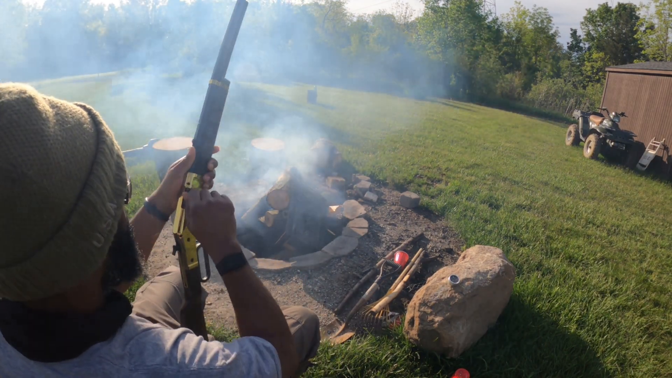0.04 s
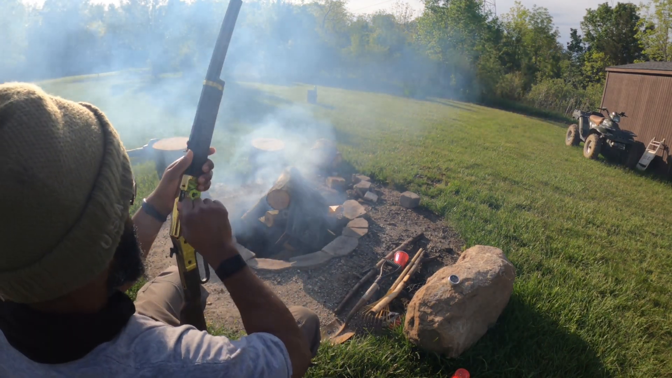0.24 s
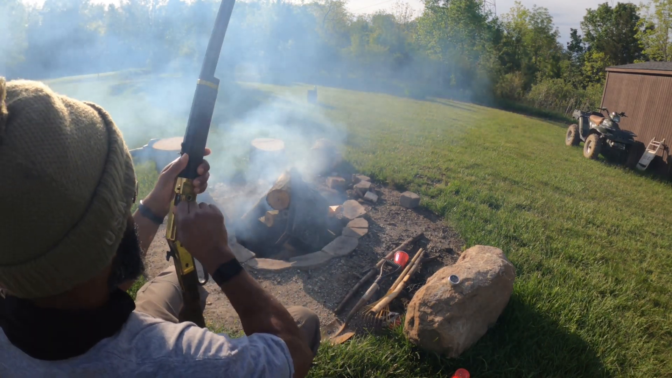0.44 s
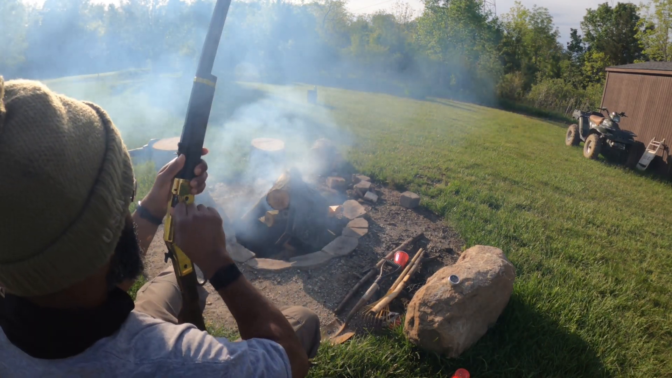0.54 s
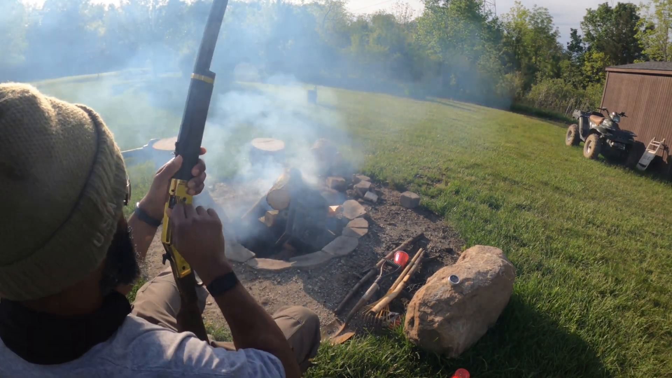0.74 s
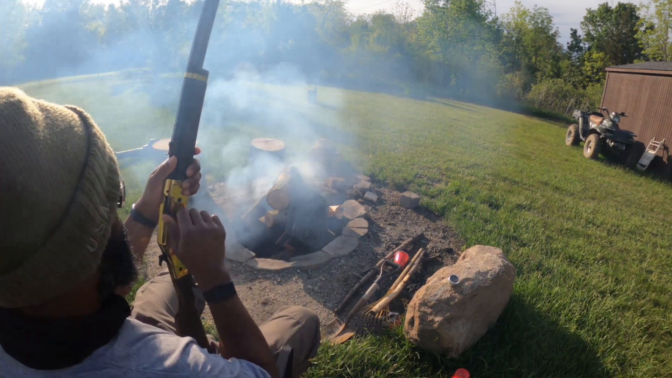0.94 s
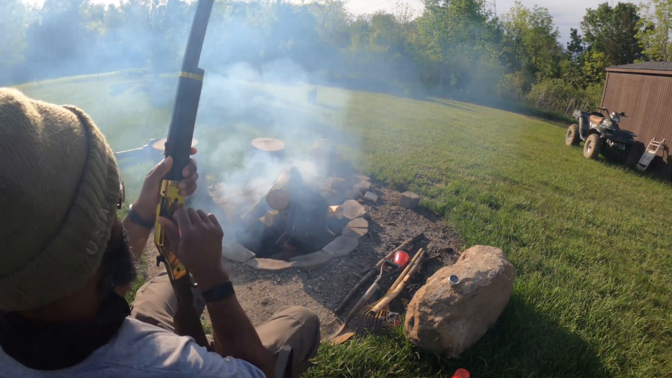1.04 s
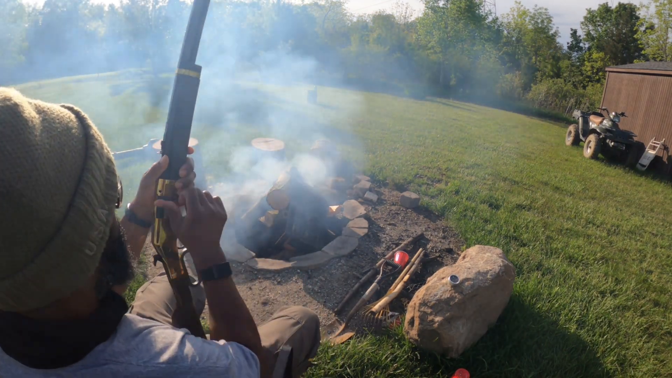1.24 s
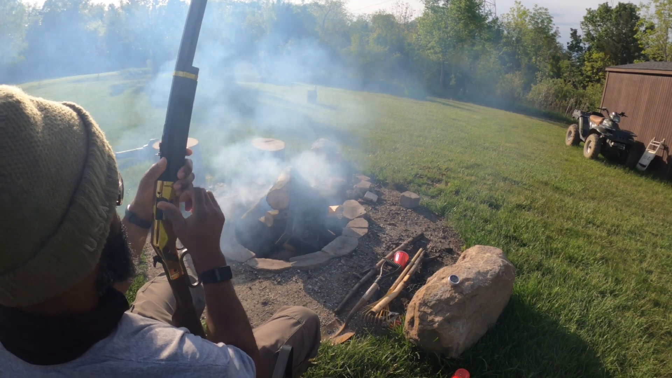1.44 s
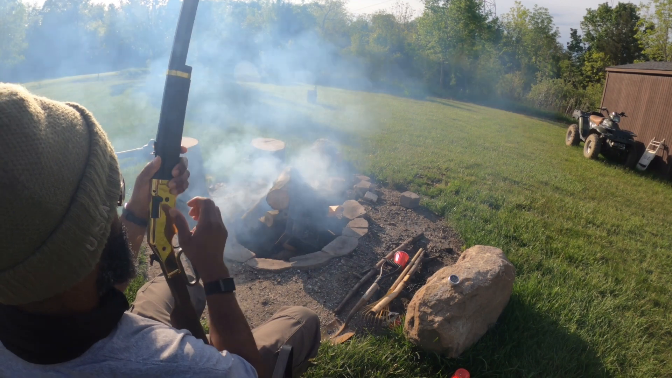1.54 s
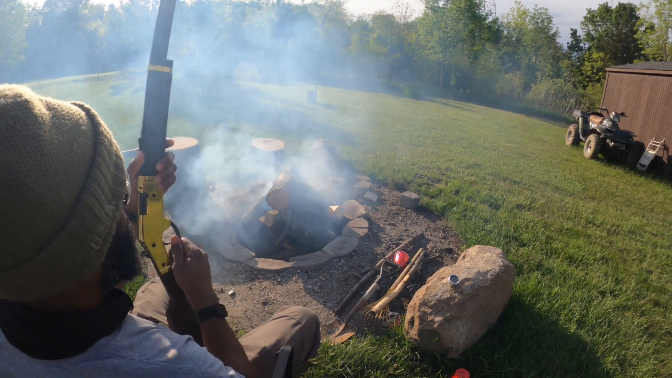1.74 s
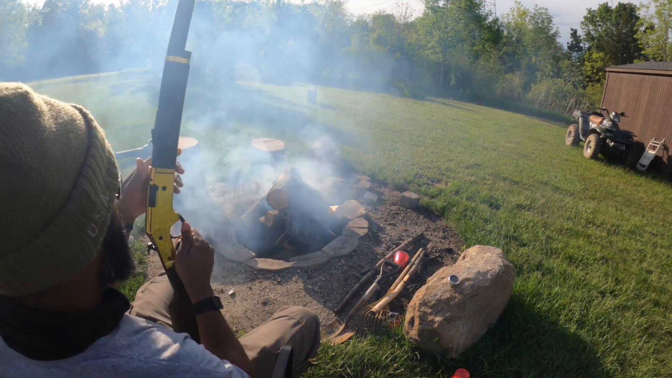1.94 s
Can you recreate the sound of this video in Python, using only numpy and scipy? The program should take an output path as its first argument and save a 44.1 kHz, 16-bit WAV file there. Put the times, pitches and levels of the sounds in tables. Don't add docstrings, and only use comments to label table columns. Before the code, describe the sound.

Steel lever parts scrape, click and slam, first opening, then shutting about a second later, with small spring pings and a short dry echo; outdoors, close microphone, soft wind, distant birdsong and slight sleeve rustle.

```python
import sys
import numpy as np
from scipy import signal
from scipy.fft import rfft, irfft, next_fast_len
from scipy.io import wavfile
from scipy.ndimage import uniform_filter1d, map_coordinates

SR = 44100
rng = np.random.default_rng(int(sys.argv[2]) if len(sys.argv) > 2 else 0)


def wrap_up_sound(samples):
    columns = np.atleast_2d(samples).T
    tamed = np.clip(columns, -1, 1)
    steps = np.round(tamed * 32767).astype(np.int16)
    wavfile.write(sys.argv[1], SR, steps)


def attenuation_scalar(level_db):
    decades = np.asarray(level_db, float) / 20
    return 10 ** decades


N = 88200


def unit(x):
    return x / np.sqrt(np.mean(x ** 2) + 1e-20)


def along(points, hz):
    f, v = np.transpose(points)
    return np.interp(np.log(hz + 1), np.log(f + 1), v)


def wobble(rate):
    knots = rng.standard_normal(int(N * rate / SR) + 4)
    return map_coordinates(knots, [np.arange(N) * rate / SR])


def filtered(x, response):
    m = next_fast_len(x.shape[-1] + 4096)
    return irfft(rfft(x, m) * response(np.fft.rfftfreq(m, 1 / SR)), m)[..., :x.shape[-1]]


def rush(spectrum, alike, patchy_db):
    z = signal.stft(rng.standard_normal((2, N)), nperseg=512)[2]
    field = uniform_filter1d(rng.standard_normal(z.shape[1:]), size=5, axis=0)
    field = uniform_filter1d(field, size=10, axis=1)
    pair = signal.istft(z * attenuation_scalar(patchy_db * unit(field)), nperseg=512)[1][:, :N]

    def mid_side(hz):
        angle = np.arccos(np.clip(along(alike, hz), -1, 1)) / 2
        return attenuation_scalar(along(spectrum, hz)) * [np.cos(angle), np.sin(angle)]

    mid, side = filtered(pair, mid_side)
    return unit(np.array([mid + side, mid - side]))


def tail(x, t60):
    t = np.arange(SR // 4) / SR
    answer = rng.standard_normal((2, len(t))) * attenuation_scalar(-60 * t / t60) * (1 - np.exp(-t / 0.0048))
    return signal.fftconvolve(x[None], answer / np.linalg.norm(answer[0]), axes=1)[:, :N]


# (start [s], length [s])
STROKES = [(-.003, .075), (.206, .071), (.28, .11), (.675, .05), (.802, .06), (1.145, .022), (1.167, .02),
           (1.238, .09), (.178, .03), (.06, .08), (1.186, .05)]
# (level [dB], fade over the stroke [dB], brightness [dB per octave])
PRESSURE = [(-48, -21.5, 2), (-48, 4.5, -1.5), (-49.5, -12.5, 1.5), (-54, -8, -3), (-60, -5.5, -9.5),
            (-59.5, 0, -2), (-53, 5, 6.5), (-35.5, -37, -0.5), (-55, -2, -4), (-79.5, 13.5, -0.5),
            (-48.5, 1, 2.5)]
# (frequency [Hz], level [dB])
DRAG_COLOUR = [(600, -3), (1000, 2), (1400, 9.5), (2500, 3), (4000, 0), (7000, -10.5), (12000, -30),
               (16000, -59)]
SLIPS_PER_S, SLIP_SPREAD_DB, SLIP_T60 = 4500, 2.5, 0.012


def slides():
    t = np.arange(N) / SR
    slips = (rng.random(N) < SLIPS_PER_S / SR) * rng.standard_normal(N)
    slips *= attenuation_scalar(SLIP_SPREAD_DB * rng.standard_normal(N))
    decay = attenuation_scalar(-120 * t[:SR // 40] / SLIP_T60)
    rattle = np.abs(signal.fftconvolve(slips ** 2, decay)[:N]) ** 0.5
    grit = rattle * rng.standard_normal(N) * attenuation_scalar(0.78 * wobble(130))
    out = np.zeros(N)
    for (s, length), (db, fade_db, tilt_db) in zip(STROKES, PRESSURE):
        press = attenuation_scalar(db + fade_db * np.clip((t - s) / length, 0, 1))
        on_off = np.clip(np.minimum((t - s) / 0.0022, (s + length - t) / 0.0076), 0, 1)
        colour = lambda f: attenuation_scalar(along(DRAG_COLOUR, f) + tilt_db * np.log2((f + 1) / 2000))
        out += press * on_off * unit(filtered(grit, colour))
    return out


# (time [s], level [dB])
WIND = [(0, -52.5), (.25, -50.5), (.45, -51.5), (.7, -54.5), (.9, -51), (1.1, -54.5), (1.4, -53.5),
        (1.65, -51), (2, -54)]
# (frequency [Hz], level [dB per Hz])
RUMBLE = [(12, -40), (20, -26.5), (49, -1), (92, -1.5), (125, -2), (200, -10), (226, -13), (325, -19.5),
          (500, -42), (650, -66.5), (1100, -120)]
# (frequency [Hz], level [dB per Hz])
AIR = [(240, -32.5), (400, -11.5), (814, -8), (1030, -7.5), (1870, -21), (2510, -15), (3470, -28),
       (4950, -32), (16000, -56.5)]
# (frequency [Hz], likeness [0 to 1])
RUMBLE_ALIKE = [(30, 1), (150, 0.9), (400, 0.71)]
AIR_ALIKE = [(500, 0.91), (2000, 0.11), (8000, 0.12)]
# (frequency [Hz], level [dB])
HUM = [(119.5, -64.5), (179, -62.5)]
AIR_DB = -65.5


def meadow():
    t = np.arange(N) / SR
    gusts = attenuation_scalar(1.8 * wobble(8)) * rush(RUMBLE, RUMBLE_ALIKE, patchy_db=1.5)
    rumble = attenuation_scalar(np.interp(t, *np.transpose(WIND))) * unit(gusts)
    hum = np.zeros(N)
    for hz, db in HUM:
        hum += attenuation_scalar(db + 1.1 * wobble(4.5)) * np.sin(2 * np.pi * hz * t + 0.77 * wobble(8.2))
    hiss = attenuation_scalar(AIR_DB + 0.36 * wobble(1.3)) * rush(AIR, AIR_ALIKE, patchy_db=1.8)
    return rumble + hum + hiss


ATTACK_S = 0.00045


def onset(t, attack_s):
    return (1 - np.exp(-(t / attack_s) ** 2)) * np.cos(np.pi / 2 * t / t[-1]) ** 2


# (time [s], level [dB], brightness [dB per octave], t60 [s], favoured pitch of the struck part [Hz])
OPENING = [(.0005, -47, 8, 0.025, 1980), (0.041, -58.5, 7, 0.015, 6500), (0.1373, -58, 4.5, 0.03, 6800),
           (0.1848, -49, -3, 0.034, 1820), (0.2042, -40, 2.5, 0.024, 2200), (0.2057, -29, 0.5, 0.021, 1680),
           (0.2349, -32, -1, 0.046, 1600), (0.25, -47, -12.5, 0.025, 1230), (0.2556, -47, 9.5, 0.016, 4300),
           (.265, -47.5, -17.5, 0.067, 1290), (0.2761, -17, -0.5, .025, 1110),
           (.2805, -31, 2.5, 0.094, 2200), (0.2862, -42.5, 2, .04, 4000), (0.3173, -47, 7.5, 0.029, 4100),
           (0.3243, -44, 4.5, 0.023, 4100), (0.33, -50, 5.5, 0.035, 4000), (.345, -53, 8.5, .04, 4040),
           (0.6764, -49, -5, 0.043, 1820), (0.679, -54.5, 3, 0.024, 4300), (.6872, -50.5, -10, 0.025, 1490),
           (0.6921, -45.5, -6, 0.11, 1430), (0.704, -53.5, -3, 0.053, 1300), (0.788, -59, -3, 0.015, 3750),
           (0.8, -31.5, -4.5, 0.052, 1226), (.8265, -40, -7.5, 0.087, 1510)]
CLOSING = [(1.1103, -52.5, -2.5, 0.088, 1420), (1.117, -51, -5, 0.05, 2780), (1.121, -64, -5, 0.068, 2815),
           (1.146, -61, -2, 0.022, 2790), (1.167, -45, 6.5, 0.051, 2500), (1.1751, -40.5, 3, 0.024, 2800),
           (1.1859, -42, 5.5, .022, 2900), (1.2001, -45.5, 8, 0.017, 3990), (1.213, -32.5, 2, 0.027, 2400),
           (1.2337, -25.5, -6, 0.041, 1280), (1.2403, -19.5, 1, 0.025, 1700),
           (1.2418, -30, 0.5, 0.067, 3670), (1.2504, -34.5, -6, 0.037, 1620),
           (1.2565, -22.5, -3, 0.017, 1550), (1.265, -40.5, -3, .03, 1410), (1.271, -61, -6, 0.024, 1400),
           (1.3898, -55.5, 0, 0.014, 4100)]
# (frequency [Hz], level [dB])
RECEIVER = [(1050, -8), (1220, -2), (1420, -10), (1630, -9), (1830, -7.5), (2230, -1), (2800, -2.5),
            (3200, -2.5), (3750, -3), (4300, -7.5), (4900, -5.5), (5750, -9.5), (6600, -23), (8100, -32)]
# (frequency [Hz], level [dB])
CRACK = [(150, -57.5), (450, -9), (900, -2), (1300, 4), (3000, -4), (7000, -9), (12000, -19), (16000, -38)]
CRACK_DB, CRACK_T60 = 6, 0.025
SHORTER_UP = 0.16
HARD_DB = -14
SOFT_HZ, SOFT_DB = 7100, 0.5
SOFT_SLOWER = 0.041
FAVOUR_DB, FAVOUR_OCTAVES = 9.5, 0.25
SNAP_DB, SNAP_T60 = 6.5, 0.0084
CREST_S, SCATTER = 0.001313, 0.9
STOCK_HZ, STOCK_DB, STOCK_T60 = 477, -22, 0.013


def blows():
    steel, wood, t = np.zeros(N + SR), np.zeros(N + SR), np.arange(SR // 8) / SR
    hz, mode_db = np.transpose(RECEIVER)[..., None]
    for s, db, tilt_db, t60, part_hz in OPENING + CLOSING:
        detune, size, phase = rng.standard_normal((3, len(hz), 1))
        soft = max(HARD_DB - db, 0)
        rise = onset(t, ATTACK_S * (1 + SOFT_SLOWER * soft))

        def favour(f):
            return FAVOUR_DB * np.exp(-(np.log2((f + 1) / part_hz) / FAVOUR_OCTAVES) ** 2)

        def crack_colour(f):
            tilt = tilt_db * np.log2((f + 500) / 2500)
            dull = SOFT_DB * soft * np.log2(np.maximum(f / SOFT_HZ, 1))
            return attenuation_scalar(along(CRACK, f) + favour(f) + tilt - dull)

        ring = attenuation_scalar(-60 * t * (hz / hz[1]) ** SHORTER_UP / t60)
        snap = attenuation_scalar(SNAP_DB - 60 * t / SNAP_T60)
        swing = np.cos(2 * np.pi * hz * (1 + 0.015 * detune) * (t - CREST_S) + SCATTER * phase)
        strength = attenuation_scalar(mode_db + favour(hz) + tilt_db * np.log2(hz / 2000) + 1.8 * size)
        modes = (strength * (ring + snap) * swing).sum(0)
        crack = filtered(rng.standard_normal(len(t)) * attenuation_scalar(-60 * t / CRACK_T60), crack_colour)
        knock = attenuation_scalar(STOCK_DB - 60 * t / STOCK_T60) * np.sin(2 * np.pi * STOCK_HZ * t)
        start = round(s * SR)
        steel[start:][:len(t)] += attenuation_scalar(db) * rise * (0.24 * modes + attenuation_scalar(CRACK_DB) * crack)
        wood[start:][:len(t)] += attenuation_scalar(db) * rise * knock
    return steel[:N], wood[:N]


# (time [s], level [dB], frequency [Hz], t60 [s])
PINGS = [(.002, -58, 4080, 0.39), (.001, -46.5, 3350, 0.051), (.208, -34.5, 2990, 0.046),
         (0.21, -46.5, 3980, 0.048), (.2775, -21, 2238, 0.019), (.2775, -23.5, 3050, 0.019),
         (0.7991, -39.5, 3010, 0.018), (.8005, -34, 3700, .018), (.827, -41, 1804, 0.036),
         (1.168, -42, 2584, 0.089), (1.215, -38.5, 4970, 0.018), (1.2362, -27.5, 2990, 0.025),
         (1.241, -32, 7630, .02), (1.2579, -27, 3390, 0.017), (0.1383, -48.5, 4040, 0.018),
         (0.2571, -36.5, 4700, .012), (0.257, -41, 3930, 0.017), (.2725, -34, 3970, 0.035),
         (0.287, -43, 3900, 0.028), (0.326, -43, 4100, 0.028), (.356, -42, 4100, 0.013),
         (1.1754, -40, 4950, 0.012), (1.188, -30, 4100, 0.027), (.3, -51.5, 1310, .4),
         (1.2015, -48.5, 4000, .012), (1.2358, -30, 6380, 0.018), (1.39, -49, 4040, 0.0087)]


def pings():
    out, t = np.zeros(N + SR), np.arange(SR // 8) / SR
    for s, db, hz, t60 in PINGS:
        tone = attenuation_scalar(db - 60 * t / t60) * np.sin(2 * np.pi * hz * t)
        out[round(s * SR):][:len(t)] += onset(t, ATTACK_S) * tone
    return out[:N]


def whistles(notes, db):
    out = np.zeros(N + SR)
    for s, length, *hz in notes:
        u = np.linspace(0, 1, round(length * SR))
        pitch = np.polyval(np.polyfit([0, 0.5, 1], hz, deg=2), u)
        note = np.sin(np.pi * u) ** 0.4 * np.sin(2 * np.pi * np.cumsum(pitch) / SR)
        out[round(s * SR):][:len(u)] += note
    out = attenuation_scalar(db + 2 * wobble(60)) * out[:N]
    return out + attenuation_scalar(-10) * tail(out, t60=0.22)


# (start [s], length [s], first pitch [Hz], middle pitch [Hz], last pitch [Hz])
NEAR_BIRD = [(.056, .016, 2100, 2600, 3050), (.068, .025, 2950, 3080, 3280), (.09, .021, 3300, 2600, 2250),
             (.475, .02, 2750, 2580, 2600), (.503, .02, 3050, 3280, 3100), (.555, .045, 3330, 2700, 2450),
             (.592, .028, 2450, 2450, 2650), (.616, .02, 2550, 2950, 3330), (.706, .022, 2450, 2580, 2660),
             (.724, .014, 2660, 2350, 1950), (1.87, .035, 1950, 2150, 2420)]
FAR_BIRD = [(.385, .055, 2250, 2400, 2550), (1.67, .03, 2430, 2480, 2600), (.99, .09, 2450, 2450, 2500),
            (1.415, .025, 2700, 2690, 2660), (1.48, .06, 2700, 2420, 2050), (1.47, .045, 2180, 2050, 1980),
            (1.735, .05, 2150, 2280, 2400), (.11, .016, 2150, 2220, 2350), (.49, .02, 2900, 3000, 3100),
            (.512, .018, 2750, 2550, 2200), (1.745, .08, 2700, 2620, 2250), (1.82, .055, 2200, 1950, 1920),
            (.44, .025, 2200, 2250, 2350), (1.915, .09, 3000, 3280, 3200)]
HIGH_BIRD = [
    (.955, .06, 4300, 5300, 4000),
    (1.58, .04, 2750, 2700, 2450),
]


def birds():
    return whistles(NEAR_BIRD, -66.5) + whistles(FAR_BIRD, -73) + whistles(HIGH_BIRD, -84)


# (middle [s], length [s], level [dB])
RUSTLES = [
    (0.403, 0.062, -71.5),
    (0.876, 0.096, -79.5),
    (0.987, 0.054, -95),
    (1.066, .04, -83.5),
    (1.498, 0.069, -73.5),
    (1.669, 0.021, -79),
    (1.758, 0.14, -79),
    (1.864, 0.069, -72),
    (1.965, 0.46, -76),
]
# (frequency [Hz], level [dB])
CLOTH = [(1000, -16), (2200, 8.5), (4000, -4.5), (7200, -1.5), (10000, -14.5), (13000, -20), (14500, -44)]


def sleeve():
    t = np.arange(N) / SR
    swell = sum(attenuation_scalar(db) * np.exp(-(2 * (t - s) / length) ** 2) for s, length, db in RUSTLES)
    return swell * attenuation_scalar(1.5 * wobble(60)) * rush(CLOTH, AIR_ALIKE, patchy_db=1.2)


# (frequency [Hz], left over right [dB])
GUN_SIDE = [(700, -2.5), (2400, 3.7), (6000, 0), (8500, -5), (15000, -5)]
# (frequency [Hz], level [dB])
ECHO = [(1000, -8.5), (3000, 1.5), (9000, 2)]
GUN_LEAD_S, ECHO_DB, ECHO_T60 = -0.000016, -13.5, 0.042


def scene():
    drag, background = slides(), meadow()
    steel, wood = blows()
    slim = signal.ellip(5, 0.5, 30, 900, 'highpass', fs=SR, output='sos')
    gun = signal.sosfilt(slim, steel + pings() + drag) + wood
    side = np.array([[1], [-1]]) / 2
    near = filtered(gun, lambda f: attenuation_scalar(side * along(GUN_SIDE, f)) * np.exp(2j * np.pi * f * side * GUN_LEAD_S))
    echo = attenuation_scalar(ECHO_DB) * tail(filtered(gun, lambda f: attenuation_scalar(along(ECHO, f))), ECHO_T60)
    return near + echo + background + birds() + sleeve()


def band_limit(x):
    return signal.sosfilt(signal.butter(12, 16300, fs=SR, output="sos"), x)


def record(dry):
    mix = filtered(dry, lambda hz: hz < 16400)
    return band_limit(mix)


dry = scene()
out = record(dry)
wrap_up_sound(out)
```